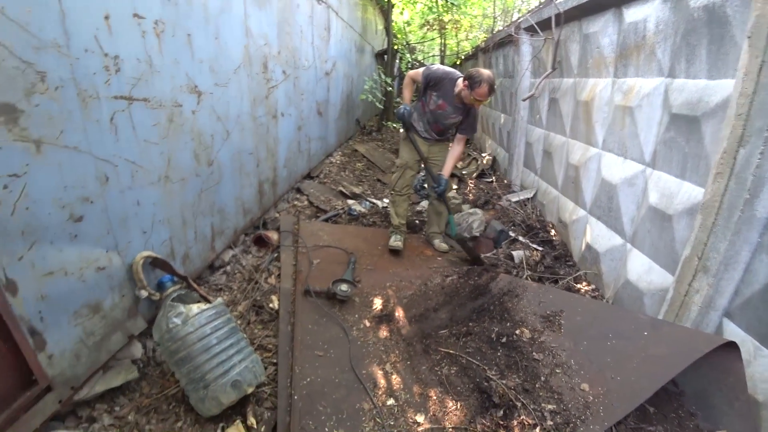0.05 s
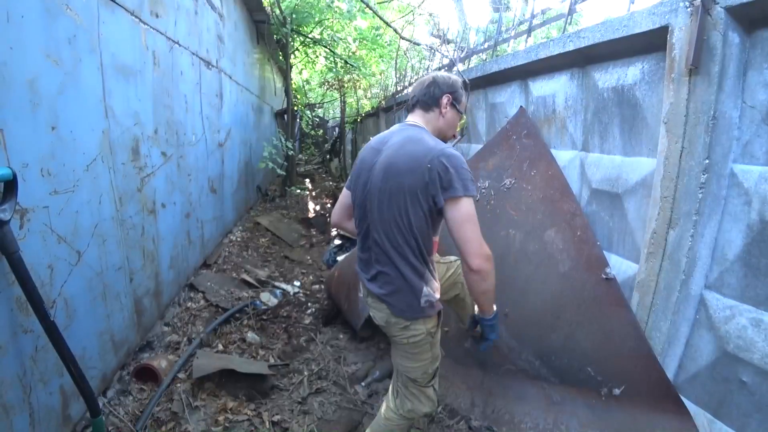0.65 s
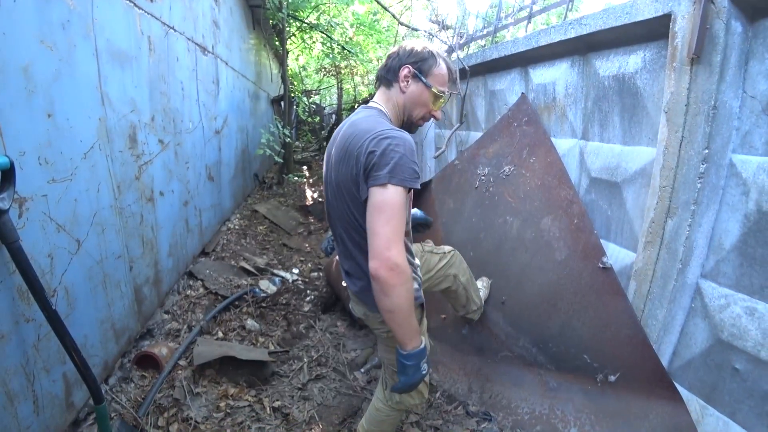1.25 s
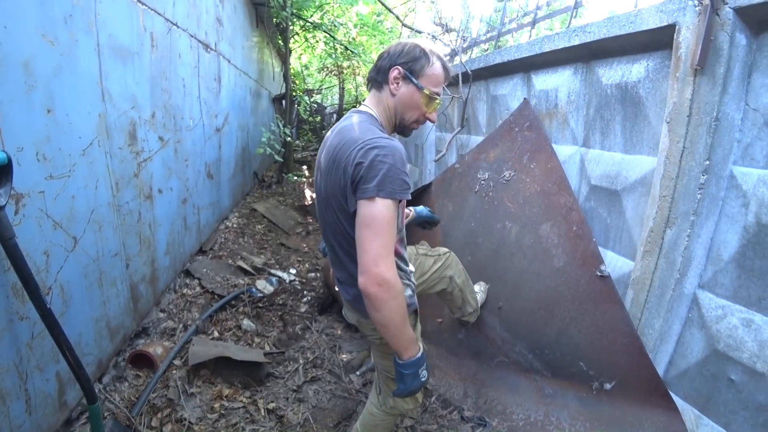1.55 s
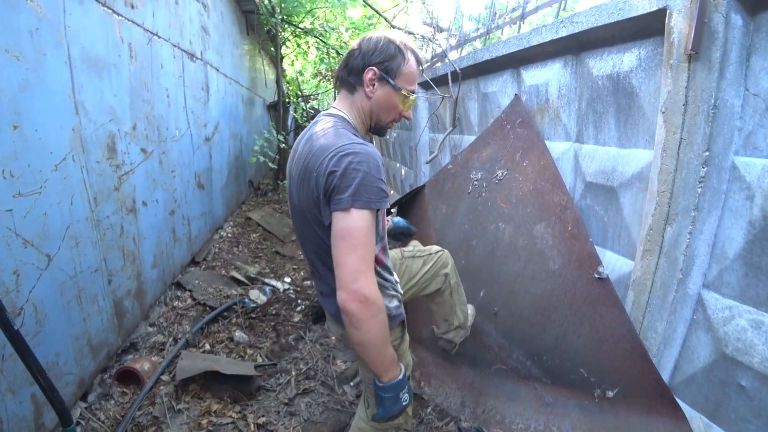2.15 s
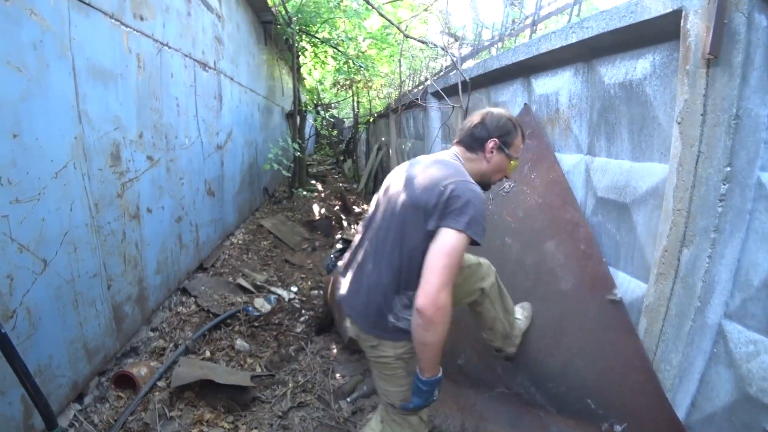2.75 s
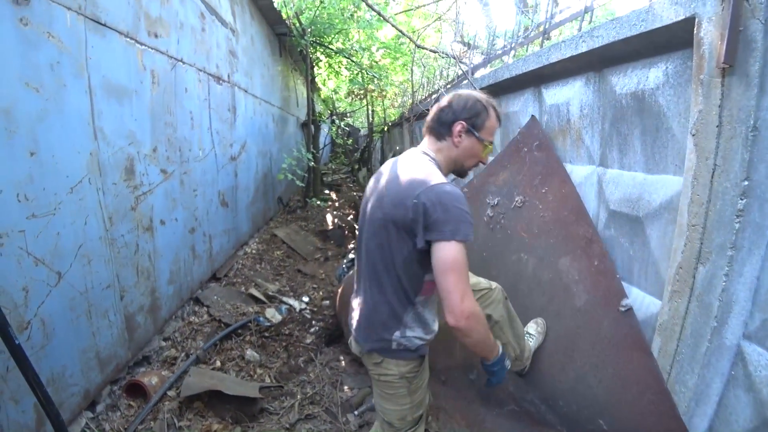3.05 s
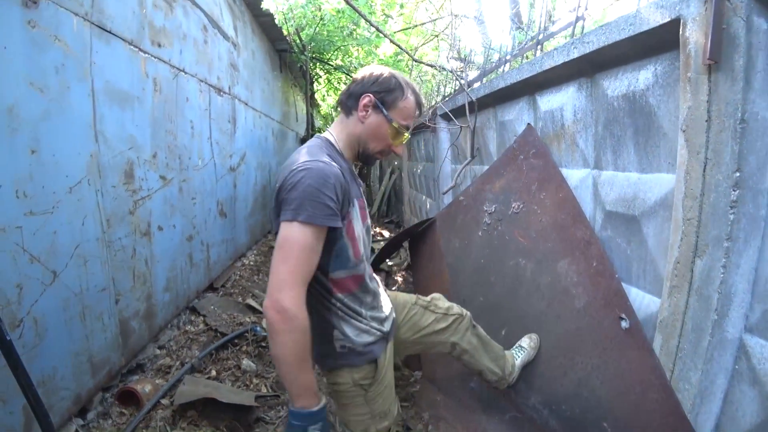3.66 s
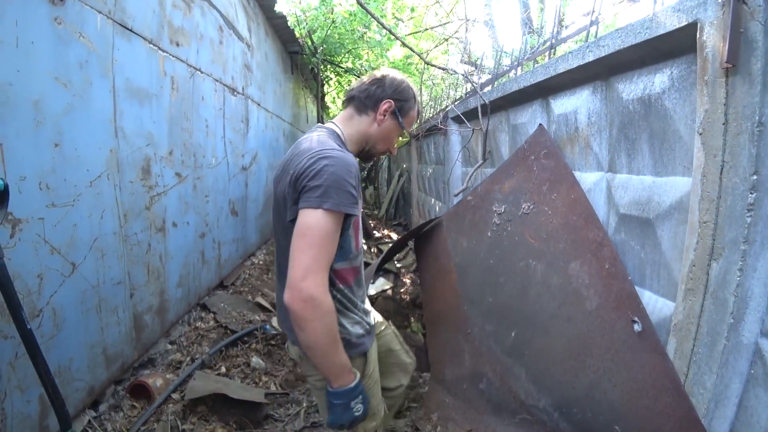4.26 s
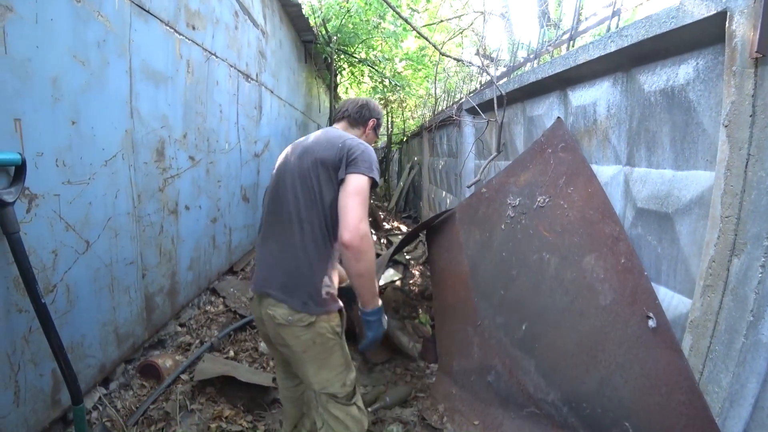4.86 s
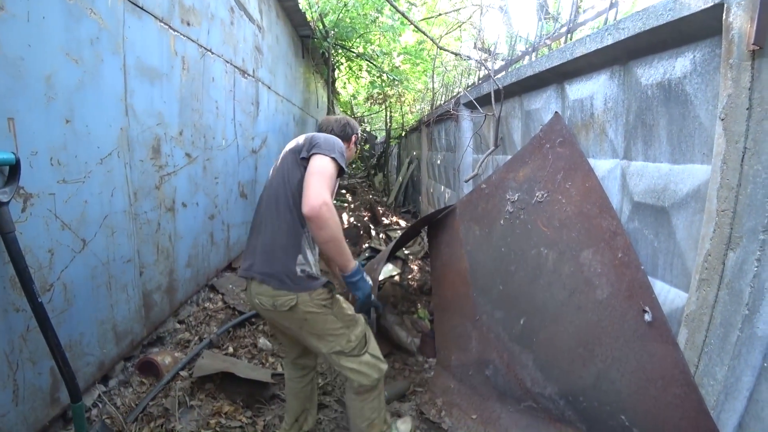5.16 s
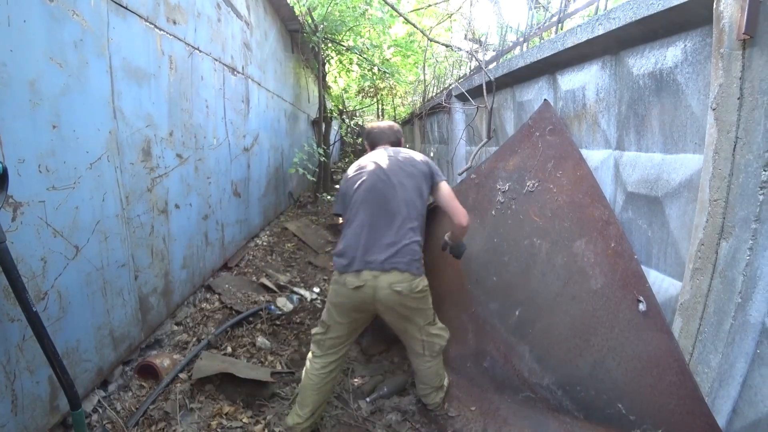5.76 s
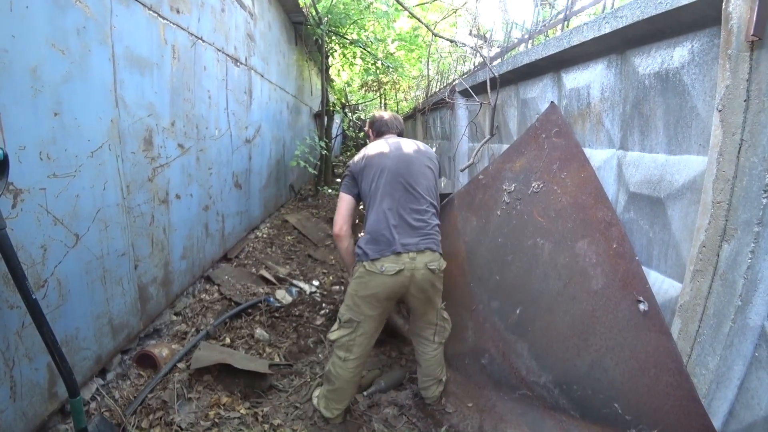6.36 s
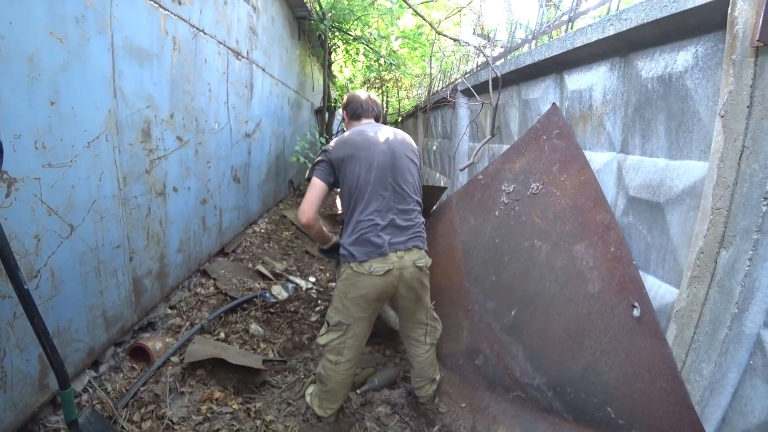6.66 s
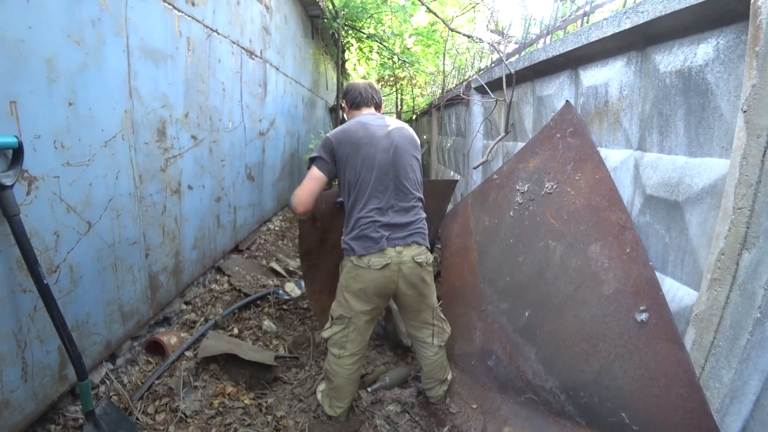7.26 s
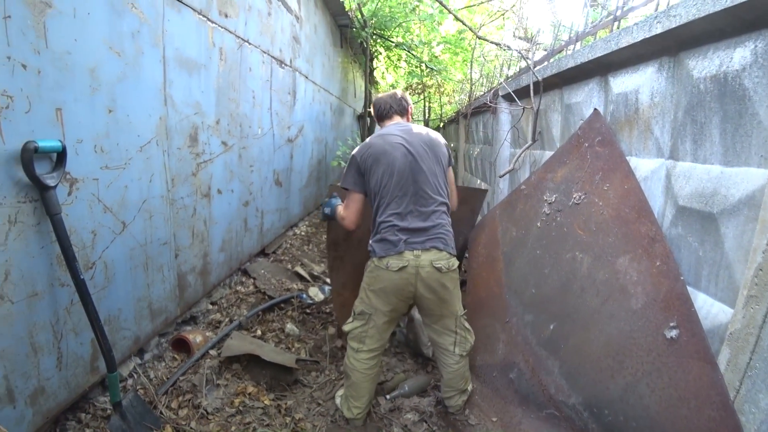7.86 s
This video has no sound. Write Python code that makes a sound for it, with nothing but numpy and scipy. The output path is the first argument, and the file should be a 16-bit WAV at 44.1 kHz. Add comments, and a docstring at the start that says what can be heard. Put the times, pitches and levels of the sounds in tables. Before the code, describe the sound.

A shovel scrapes briefly through dry debris on steel, with a couple of light knocks, and the sound drops out for an instant at 0.5 seconds. A bent steel sheet then rocks softly under a boot. From about 1.7 seconds, leaves crunch, twigs snap and the knocks grow harder. At 2.7 seconds the sheet is stamped down and thunders loudly, with sharp clanks and a short squeal, its wavering ring fading by about 4.5 seconds. Quieter steps crunch through leaves, and a second piece of steel is nudged around 5.2 seconds. From 6.2 to 7 seconds it is heaved up loudly, grinding, clanging and squealing over crushed leaves. It rings down amid small snaps, with one more rustle near 8 seconds. Knocks echo briefly off close walls, while soft outdoor air and a faint, fast, deep microphone throb run underneath.

```python
"""Dry leaves and twigs crunch as a shovel scrapes through debris on a steel sheet, over a faint low throb
in the microphone. A boot rocks the bent, rusty sheet, then stamps it down so that it thunders; a second
piece is heaved up, grinding and squealing. Jolts and tiny slips ring the steel's modes, which waver as
it bends. Knocks, snaps and squeals echo briefly in the narrow gap between a garage and a concrete fence."""
import sys
import numpy as np
from scipy import signal
from scipy.io import wavfile
from scipy.ndimage import uniform_filter1d, map_coordinates

SR = 44100
rng = np.random.default_rng(int(sys.argv[2]) if len(sys.argv) > 2 else 0)


def wrap_up_sound(samples):
    """Save the sound to the file named by the first command line argument, as 16-bit audio."""
    columns = np.atleast_2d(samples).T
    # keep every value between -1 and 1, then stretch to whole-number steps
    tamed = np.clip(columns, -1, 1)
    steps = np.round(tamed * 32767).astype(np.int16)
    wavfile.write(sys.argv[1], SR, steps)


N = 349272
TIME = np.arange(N) / SR
CLOCK = TIME[::32]  # coarse time for envelopes


def amp(db):
    """Decibels to gain."""
    return 10 ** (np.asarray(db) / 20)


def unit(x):
    """Scales to rms 1."""
    return x / np.sqrt(np.mean(x ** 2) + 1e-20)


def read(curve, hz):
    """Reads a curve over log frequency."""
    freq_hz, value = np.transpose(curve)
    return np.interp(np.log(hz + 1), np.log(freq_hz + 1), value)


def add(mix, start_s, sound):
    """Mixes a mid-side sound in at start_s."""
    part = mix[:, max(round(start_s * SR), 0):][:, :sound.shape[1]]
    part += sound[:, :part.shape[1]]


def colour(x, db_at, size=4096):
    """Minimum-phase EQ whose gain in dB is a function of frequency."""
    hz = abs(np.fft.fftfreq(size, 1 / SR))
    log_gain = np.log(amp(np.maximum(db_at(hz), -100)))
    taps = np.fft.ifft(np.exp(np.conj(signal.hilbert(log_gain)))).real
    return signal.oaconvolve(x, taps[None], axes=1)[:, :x.shape[1]]


def band(x, lo_hz, hi_hz, order=4):
    """Band-pass."""
    return signal.sosfilt(signal.butter(order, [lo_hz, hi_hz], "band", fs=SR, output="sos"), x)


def loudness(x, span_s):
    """Running rms under a soft window."""
    size = max(int(span_s * SR), 2)
    return np.sqrt(abs(uniform_filter1d(uniform_filter1d(x ** 2, size), size)) + 1e-18)


def impacts(per_s, spread_db):
    """Random tiny impacts, mostly small and a few large."""
    size = amp(spread_db * np.minimum(rng.exponential(1, N), 4))
    return unit(size * rng.choice([-1, 1], N) * (rng.random(N) < per_s / SR))


def decay(age_s, t60_s):
    """Falls 60 dB in t60_s."""
    return np.exp(-np.log(1000) * age_s / t60_s)


def dense_ring(t60_curve, count):
    """Mid and side ring of countless modes, each band dying at its own speed."""
    hz, age_s, spectrum = signal.stft(rng.standard_normal((2, count)), SR, nperseg=256)
    return signal.istft(spectrum * decay(age_s, read(t60_curve, hz)[:, None]), SR)[1][:, :count]


def bursts(cues, crack, below_db, above_db, count=8192):
    """Each hit is a click and a fast-dying noise band; below_db and above_db steepen its two skirts."""
    out = np.zeros((2, N))
    for start_s, level_db, centre_hz, octaves, t60_s in cues:
        def skirts_db(hz):
            distance = np.log2((hz + 1) / centre_hz) / octaves
            return -np.where(hz < centre_hz, below_db, above_db) * np.log10(1 + distance ** 2)
        burst = rng.standard_normal((2, count)) * decay(TIME[:count], t60_s)
        burst[0, 0] += crack
        burst = colour(burst, skirts_db)
        attack_rms = np.std(burst[0, :SR // 150])
        add(out, start_s, amp(level_db) * burst / attack_rms)
    return out


# Tone of the still outdoor air: freq_hz, gain_db
AIR_EQ = [(40, 20), (80, 14.5), (130, 0), (240, 3.5), (400, -1), (900, 0.5), (2000, -14), (4000, -37),
          (7000, -47), (11000, -39)]

def air(level_db=-35.5):
    """A soft, steady bed of outdoor noise."""
    return amp(level_db) * unit(colour(rng.standard_normal((2, N)), lambda hz: read(AIR_EQ, hz)))


def throb(din, cycle_s=0.12105, gap_s=0.05, push_s=0.006, pull=0.58, level_db=-26, threshold_db=-17):
    """Sub-bass flutter at the microphone: push, pull, push in every cycle, ducking under a loud din."""
    anchor_s = np.where(TIME < 0.5, 0.098, 0.627)  # the beat shifts once
    offsets = [(TIME - anchor_s - lag + cycle_s / 2) % cycle_s - cycle_s / 2
               for lag in (0, gap_s / 2, gap_s)]
    first, between, second = (np.exp(-(offset / push_s) ** 2 / 2) for offset in offsets)
    low_cut = signal.butter(2, 13, "high", fs=SR, output="sos")
    flutter = signal.sosfiltfilt(low_cut, first - pull * between + second)
    roar = loudness(band(din, 500, 8000), span_s=0.08)
    return unit(flutter) * amp(level_db) / np.hypot(1, (roar / amp(threshold_db)) ** 2)


def alley(x, wet_db=-13):
    """The close walls throw back a short tail."""
    tail = dense_ring([(200, 0.13), (1500, 0.31), (8000, 0.15)], count=SR // 2)
    tail[:, :SR // 200] = 0  # 5 ms pre-delay
    return x + amp(wet_db) * signal.fftconvolve(x[:1], tail / np.linalg.norm(tail[0]), axes=1)[:, :N]


def flakes(stir_db, t60_s=0.015, level_db=-39, follow=0.93):
    """Single dry leaves and rust flakes tick, louder when the ground is disturbed."""
    breaks = impacts(per_s=34, spread_db=12.5)[None]
    tick = dense_ring([(200, t60_s), (11000, t60_s)], count=2048)
    ticks = band(signal.fftconvolve(breaks, tick, axes=1)[:, :N], 5000, 11000, order=2)
    return unit(ticks) * amp(level_db + follow * (stir_db - stir_db.max()))


# Tone of crushed dry leaves: freq_hz, gain_db
CRUNCH_EQ = [(400, -4.5), (1000, 0), (2000, -0.5), (3000, 0.5), (5000, 2), (7000, 5), (8800, -2.5),
             (11000, -3.5)]

def crunch(stir_db, grit_db, rub=0.98, grit_hz=5500, trim_db=0.5):
    """Leaves and rust break in countless grains over a smooth rub; hard grit lifts the lower rasp."""
    grains = np.array([impacts(per_s=1300, spread_db=3) for _ in range(2)])
    grains += rub * rng.standard_normal((2, N))
    grains = colour(grains, lambda hz: read(CRUNCH_EQ, hz))
    rasp = signal.sosfiltfilt(signal.butter(3, grit_hz, fs=SR, output="sos"), grains)
    grains += rasp * (amp(grit_db) - 1)
    treble = band(grains[0], 3500, 11000)
    return grains / loudness(treble, span_s=0.33) * amp(stir_db + trim_db)


# Strokes of boot, shovel or steel through the leaves: peak_s, build_s, level_db, grit_db
STROKES = [(.115, 0.088, -28, -1), (.47, 1, -46.5, 0.5), (1.13, 0.13, -46, 7), (1.6, 0.88, -41, 4.5),
           (1.694, 0.077, -35, 4.5), (1.853, 0.06, -27.5, 3), (1.959, .05, -37.5, 7.5),
           (2.055, 0.049, -31.5, 10), (2.27, 0.29, -39.5, 10), (2.483, 0.26, -24.5, 5.5),
           (2.633, .04, -37, -3), (2.755, 0.017, -26.5, -1), (2.83, 0.05, -27, 3), (3.02, 0.13, -29.5, 2.5),
           (3.133, 0.1, -35.5, 12.5), (3.27, 0.09, -31, 0), (3.655, 0.27, -38.5, 3.5),
           (3.882, 0.21, -32.5, 1), (4.02, 0.041, -39.5, 11.5), (4.665, 0.085, -53, -2),
           (4.733, 0.24, -30.5, -3), (4.9, 0.39, -38.5, -1), (5.175, 0.63, -35, -4),
           (5.32, 0.37, -40.5, -4.5), (5.54, 0.11, -34.5, -1), (5.644, 0.21, -28.5, -1.5),
           (5.82, 0.25, -32, -3), (6.192, 0.092, -24.5, -1), (6.32, .12, -33, -1), (6.51, 0.19, -33.5, 8),
           (6.714, 0.22, -22, 1.5), (6.8, 0.049, -18.5, -0.5), (6.875, 0.18, -23, 11.5),
           (6.95, .1, -21.5, 0.5), (7.15, 0.14, -32.5, 2), (7.3, .25, -42, 5), (7.47, 0.84, -44, -1),
           (7.9, 0.32, -28, 0)]

def leaves(rest_db=-57.5, build_db=21, release_db_per_s=172.5, linger_db=-18.5, linger_db_per_s=19.5):
    """Each stroke builds pressure, lets go and leaves the debris settling."""
    power, weighted_grit = amp(rest_db) ** 2, 0
    for peak_s, build_s, level_db, grit_db in STROKES:
        before_s, after_s = np.maximum(peak_s - CLOCK, 0), np.maximum(CLOCK - peak_s, 0)
        fade_in = np.clip(3 - 2 * before_s / build_s, 0, 1)
        swell = amp(level_db - build_db * before_s / build_s) ** 2
        release = amp(-release_db_per_s * after_s) ** 2 + amp(linger_db - linger_db_per_s * after_s) ** 2
        stroke = fade_in * swell * release
        power += stroke
        weighted_grit += stroke * grit_db
    stir_db = np.interp(TIME, CLOCK, 10 * np.log10(power))
    return crunch(stir_db, np.interp(TIME, CLOCK, weighted_grit / power)) + flakes(stir_db)


# Twigs and rust scales breaking: start_s, level_db, centre_hz, t60_s
SNAPS = [(.39, -36, 5940, 0.028), (0.525, -36, 6700, 0.089), (.6021, -30, 6500, .084),
         (.794, -33.5, 5000, 0.021), (1.083, -34.5, 5940, 0.07), (1.672, -25.5, 4300, .06),
         (1.7893, -30, 5160, 0.023), (2.054, -25.5, 4270, 0.12), (2.3412, -18, 4800, .03),
         (2.426, -16.5, 5270, 0.023), (2.499, -15.5, 4830, 0.01), (2.7428, -23.5, 3480, .1),
         (3.253, -20.5, 3970, 0.089), (3.382, -30, 5000, 0.12), (3.995, -29, 4940, .074),
         (4.1809, -32, 6700, 0.016), (4.652, -19.5, 6240, 0.07), (5.745, -34, 3020, 0.037),
         (6.12, -37, 3000, 0.079), (6.527, -21.5, 6610, .04), (6.679, -24, 3000, .048),
         (6.783, -21.5, 4000, .04), (7.143, -26.5, 3470, 0.069), (7.3997, -23.5, 3520, .03),
         (7.447, -32.5, 3400, .035), (7.657, -31, 6100, .042)]

def snaps(octaves=1):
    """Brittle twigs and rust give way with a bright crack."""
    cues = [(start_s, level_db, hz, octaves, t60_s) for start_s, level_db, hz, t60_s in SNAPS]
    return bursts(cues, crack=4.9, below_db=22.5, above_db=37)


# Steel edges catching: start_s, length_s, pitch_hz, width_hz, level_db
SQUEALS = [(1.39, 0.17, 686, 130, -36.5), (3.168, 0.042, 1530, 260, -18), (3.168, 0.045, 2140, 300, -25),
           (6.258, 0.043, 1595, 90, -25), (6.725, .05, 1020, 120, -19.5), (6.801, 0.051, 820, 220, -16.5),
           (6.805, 0.027, 2160, 276, -22.5), (6.85, 0.06, 2690, 300, -19.5)]

def squeals():
    """A dragged edge sticks and slips, singing in one narrow, unsteady resonance."""
    out = np.zeros((2, N))
    for start_s, length_s, pitch_hz, width_hz, level_db in SQUEALS:
        noise = rng.standard_normal((2, SR // 2))
        sing = band(noise, pitch_hz - width_hz / 2, pitch_hz + width_hz / 2, order=2)
        count = int(length_s * SR)
        add(out, start_s, amp(level_db) * unit(sing[:, -count:] * signal.windows.tukey(count, 0.5)))
    return out


# Shovel, boot and scrap hitting the steel: start_s, level_db, centre_hz, width_octaves, t60_s
KNOCKS = [(.008, -30, 600, 1.5, 0.076), (.1759, -17.5, 2280, 1.35, 0.023), (0.3115, -22, 1970, 0.44, 0.023),
          (.632, -32.5, 756, 0.75, 0.18), (1.4704, -23, 855, 0.74, 0.033), (1.669, -22.5, 257, 0.38, 0.069),
          (1.7914, -20, 784, 1.2, 0.051), (2.0542, -12.5, 667, 0.73, 0.078), (2.075, -19, 574, 0.46, 0.044),
          (2.3631, -13.5, 700, 1.1, 0.062), (2.4168, -15.5, 1230, 1.5, 0.021),
          (2.421, -14.5, 720, 0.49, 0.0091), (2.475, -18, 2200, 0.98, .05), (2.742, -15.5, 556, 0.7, 0.087),
          (2.797, -9, 72, 0.88, 0.13), (3.172, -15.5, 1800, 0.5, 0.11), (3.281, -13.5, 1490, 0.52, 0.12),
          (3.398, -16.5, 440, 0.44, 0.24), (3.792, -27, 312, 0.65, .1), (5.0053, -32.5, 2500, .73, 0.015),
          (5.7466, -24, 295, 1.1, 0.11), (6.261, -13, 1410, 0.6, .11), (7.3999, -29, 1100, .8, 0.025)]

def knocks(thud_db=-12.5, thud_hz=294, thud_octaves=0.76, thud_t60_s=0.032):
    """Short, damped blows on the steel, each with a dull thud under it."""
    blows = bursts(KNOCKS, crack=5.2, below_db=15, above_db=23)
    thuds = [(start_s, db + thud_db, thud_hz, thud_octaves, thud_t60_s) for start_s, db, *_ in KNOCKS]
    return blows + bursts(thuds, crack=4.1, below_db=37.5, above_db=39)


def bending(x, depth, max_rate_hz=6):
    """Bending shifts all the modes together, slowly and unevenly."""
    t = TIME[:x.shape[1]]
    drift = sum(np.sin(2 * np.pi * (max_rate_hz * rng.uniform(0.18, 1) * t + rng.random()))
                for _ in range(6))
    playhead = np.cumsum(1 + depth * unit(drift))
    return np.array([map_coordinates(row, [playhead - playhead[0]], order=3, mode="mirror") for row in x])


def shaking(flexes, tone_db, fade_db_per_s, settle_db=4, settle_s=0.063):
    """Envelopes for boom, body, clang and clash: each flex rises, holds and rings away, treble first."""
    above_body = np.arange(len(tone_db)) - 1
    power = 0
    for start_s, rise_s, hold_s, level_db, tilt_db, boom_db in flexes:
        attack = np.clip((CLOCK - start_s) / rise_s, 0, 1)
        peak_db = level_db + np.array(tone_db) + tilt_db * above_body + boom_db * (above_body < 0)
        free_s = np.maximum(CLOCK - start_s - rise_s - hold_s, 0)
        drop_db = settle_db * (1 - np.exp(-free_s / settle_s))  # quick drop once no longer driven
        fall_db = np.outer(fade_db_per_s, free_s) + drop_db
        power += (attack * amp(peak_db[:, None] - fall_db)) ** 2
    return np.sqrt(power)


# Ring time of the steel: freq_hz, t60_s
STEEL_T60 = [(100, 4.6), (300, 2.95), (800, 0.27), (2000, 0.54), (5000, 0.18)]

def steel_ring(modes, modes_db):
    """One second of struck steel: a dense wash with single modes standing out."""
    age_s = TIME[:SR]
    ring = dense_ring(STEEL_T60, count=SR)
    for pitch_hz, level_db in modes:
        tone = np.sin(2 * np.pi * (pitch_hz * age_s + rng.random((2, 1))))
        ring += amp(level_db + modes_db) * decay(age_s, read(STEEL_T60, pitch_hz)) * tone
    return ring


# Borders of the steel's boom, body, clang and clash registers: edge_hz
REGISTERS_HZ = [48, 180, 480, 1200, 4200]

def sheet(flexes, ring, eq, envelopes, slips_per_s, bend_depth, jolt=0.21):
    """Jolts and a run of slips ring the steel; its four registers swell and fade as it flexes."""
    starts_s, rises_s = np.transpose(flexes)[:2]
    t = TIME[TIME >= starts_s[0]]
    force = impacts(slips_per_s, spread_db=3)[:len(t)]
    force[np.searchsorted(t, starts_s)] += jolt / rises_s  # a sudden flex jolts harder
    steel = signal.fftconvolve(force[None], ring, axes=1)[:, :len(t)]
    steel = colour(bending(steel, bend_depth), lambda hz: read(eq, hz))
    out = np.zeros((2, N))
    for lo_hz, hi_hz, envelope in zip(REGISTERS_HZ, REGISTERS_HZ[1:], envelopes):
        register = band(steel, lo_hz, hi_hz)
        levelled = register / loudness(register, span_s=0.12)
        add(out, starts_s[0], levelled * np.interp(t, CLOCK, envelope))
    return out


# Standout modes of the second piece: pitch_hz, level_db
PIECE_MODES = [(115, 5.6), (207, 0.67), (239, 0.75), (274, 5.7), (341, 2), (438, 0.67), (495, 0.83),
               (541, 4.8), (753, 1.3), (812, 1.4), (955, 1.6), (1160, 0.63), (1300, 2), (1394, 2),
               (1555, 5), (1768, 2.7), (1905, 3), (2029, 1.8), (2123, 9), (2266, 13), (2339, 3), (2473, 3)]
# Tone of its ringing: freq_hz, gain_db
PIECE_EQ = [(50, 9), (88, 4), (118, 9.5), (150, -1.5), (230, 3), (400, -3), (520, -2), (640, -2),
            (800, 0.5), (1200, -1.5), (1650, -6), (2200, -8.5), (3000, -21.5), (4500, -17)]
# Nudges and heaves: start_s, rise_s, hold_s, level_db, tilt_db_per_register, boom_db
PIECE_FLEXES = [(4.925, 0.012, 0.049, -36.5, -1.5, -6), (5.192, 0.011, 0.078, -26, -4.5, -12.5),
                (5.505, 0.0083, 0.17, -44.5, 4, 13), (5.742, 0.0068, 0.014, -36.5, -3, -17),
                (6.11, 0.016, 0.14, -45.5, 6.5, 2), (6.253, 0.03, 0.044, -16, 1.5, 1.5),
                (6.36, 0.02, 0.075, -16, -3.5, -2), (6.5, 0.035, 0.25, -26, 0.5, 1),
                (6.705, 0.014, 0.029, -21.5, 4.5, -6), (6.775, 0.033, 0.12, -22, 6.5, -11),
                (6.925, 0.022, 0.016, -14.5, -4.5, -6), (7.07, 0.058, 0.022, -36.5, 3.5, 11),
                (7.23, .02, 0.036, -44, 5.5, 1.5), (7.38, 0.0087, 0.041, -52.5, 10, -2),
                (7.79, 0.13, 0.033, -33, 2, 0)]

def heaved_piece():
    """A second piece of steel is nudged, then heaved up, grinding and clanging."""
    ring = steel_ring(PIECE_MODES, modes_db=-36)
    envelopes = shaking(PIECE_FLEXES, tone_db=[-4, 0, -2, -11.5], fade_db_per_s=[21.6, 44.3, 102, 168])
    return sheet(PIECE_FLEXES, ring, PIECE_EQ, envelopes, slips_per_s=200, bend_depth=0.01077)


# Standout modes of the bent sheet: pitch_hz, level_db
BENT_MODES = [(115, 0), (156, 3), (212, 13), (239, 1), (269, 0.5), (296, 5), (352, 11), (462, -7),
              (508, -31), (611, 2), (756, -13), (925, -11), (977, 2), (1082, 8.5), (1388, -16), (1612, 7),
              (2080, 1), (2161, -1)]
# Tone of its ringing: freq_hz, gain_db
BENT_EQ = [(50, -8.5), (85, -2.5), (120, 0), (165, -2), (215, -0.5), (270, 9), (350, 2.5), (420, 0),
           (510, 1.5), (800, 1.5), (1100, -7), (1400, -9), (2200, -19), (3000, -26), (4500, -22.5)]
# Each give under the boot: start_s, rise_s, hold_s, level_db, tilt_db_per_register, boom_db
BENT_FLEXES = [(0.0, 0.0011, 0.0083, -41.5, -0.5, 7), (.25, 0.034, 0.12, -48, -1, 3),
               (.515, 0.011, 0.12, -41.5, -3.5, 4), (.629, .005, 0.024, -34, 1, 7.5),
               (1.085, 0.014, 0.043, -39, -1.5, -4), (1.29, 0.0089, 0.058, -35.5, 1.2, 1),
               (1.5, .03, 0.45, -44.5, -4, 6), (1.935, 0.0099, 0.015, -33.5, -0.5, -19),
               (2.255, 0.005, 0.0086, -42.5, 5.5, -3), (2.47, 0.0055, 0.022, -31, -0.5, -2),
               (2.742, 0.0064, 0.061, -20.5, 0, 8), (2.81, 0.022, 0.16, -18, 3.5, -10),
               (3.03, 0.019, 0.2, -14.5, -2, 0.5), (3.255, 0.013, 0.052, -16.5, 0, 0),
               (3.461, 0.0048, 0.0068, -21, -2.5, 4), (3.665, 0.017, 0.039, -26, -0.5, -1)]

def bent_sheet():
    """The bent sheet rocks under a boot, then thunders as it is stamped down."""
    ring = steel_ring(BENT_MODES, modes_db=-31.5)
    envelopes = shaking(BENT_FLEXES, tone_db=[-6.5, -1, 0.5, -7.5], fade_db_per_s=[24.5, 32.5, 68, 97])
    return sheet(BENT_FLEXES, ring, BENT_EQ, envelopes, slips_per_s=220, bend_depth=0.01395)


# Stereo width: freq_hz, side_gain_db
WIDTH = [(30, -22), (60, -19), (150, -23), (330, -12), (700, -9.5), (1400, -5.8), (2800, -7.2),
         (5500, -8.7), (9000, -7)]

def scene():
    """Mixes in mid and side, then spreads to left and right with the throb in the centre."""
    mix = bent_sheet() + heaved_piece() + alley(knocks() + snaps() + squeals()) + leaves() + air()
    mid, side = mix[0], colour(mix[1:], lambda hz: read(WIDTH, hz))[0]
    lean_right = amp([[-0.4], [0.4]])
    return np.array([mid + side, mid - side]) * lean_right + throb(mid)


def record(dry, ceiling=0.9, cutoff_hz=11050):
    """Peaks are rounded off, the sound drops out for an instant, and the top end is cut steeply."""
    rounded = dry / (1 + (dry / ceiling) ** 6) ** (1 / 6)
    gate = (TIME < 0.494) | (TIME > 0.51)
    low_pass = signal.firwin(1001, cutoff_hz, window=("kaiser", 7), fs=SR)
    return signal.oaconvolve(rounded * gate, low_pass[None], "same")


dry = scene()
out = record(dry)
wrap_up_sound(out)
```